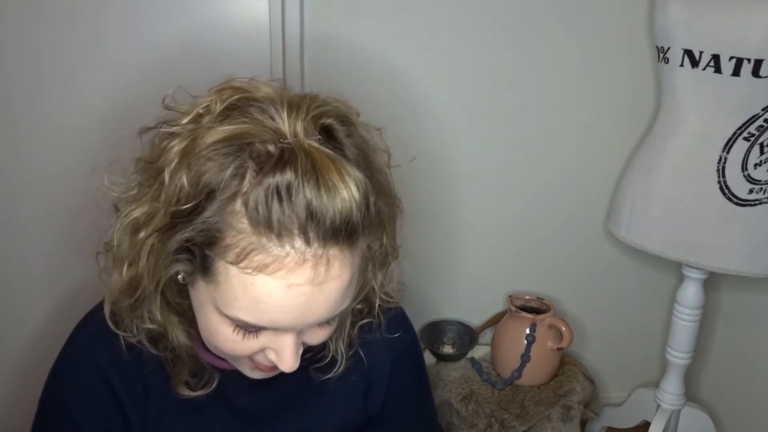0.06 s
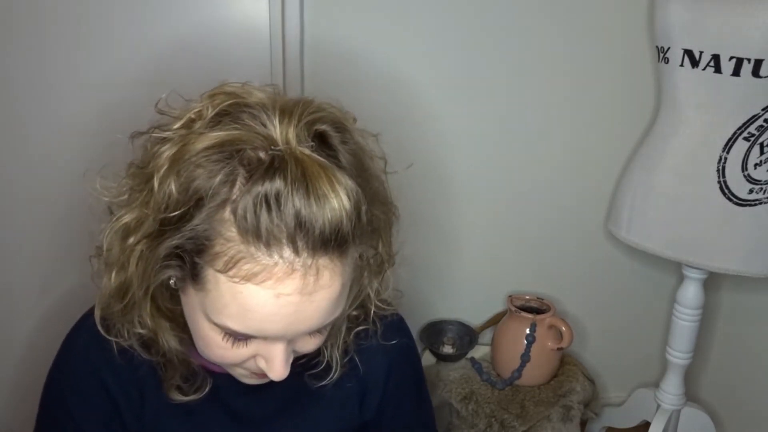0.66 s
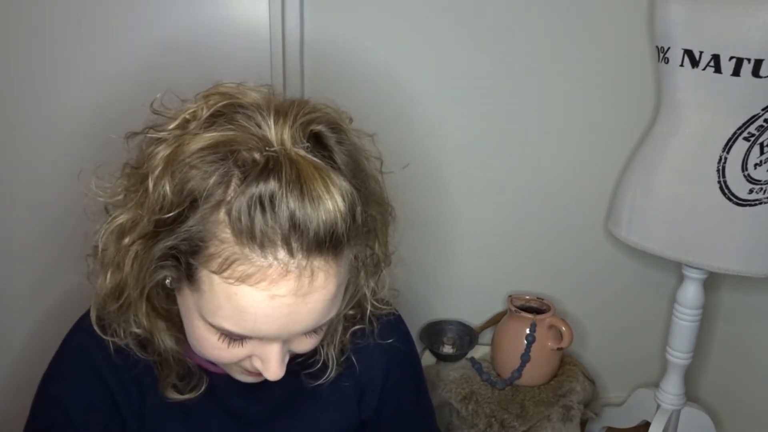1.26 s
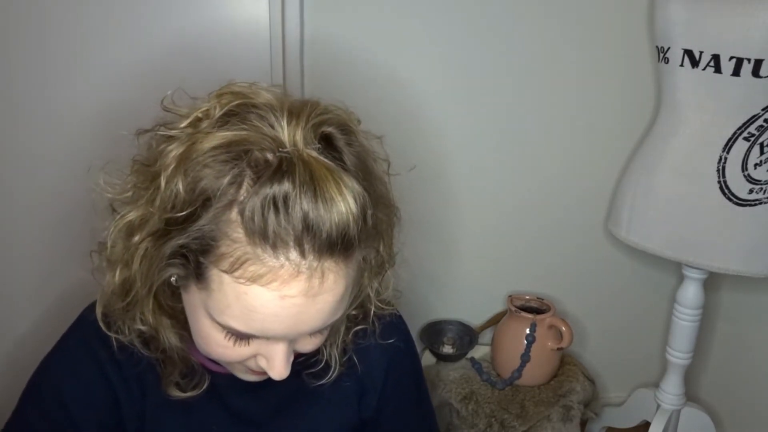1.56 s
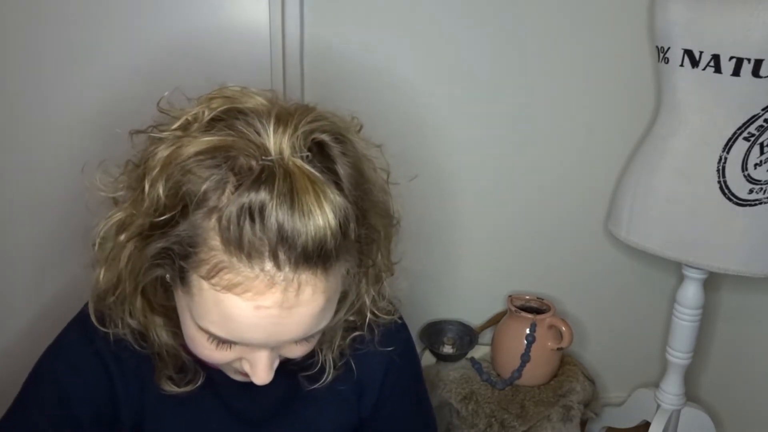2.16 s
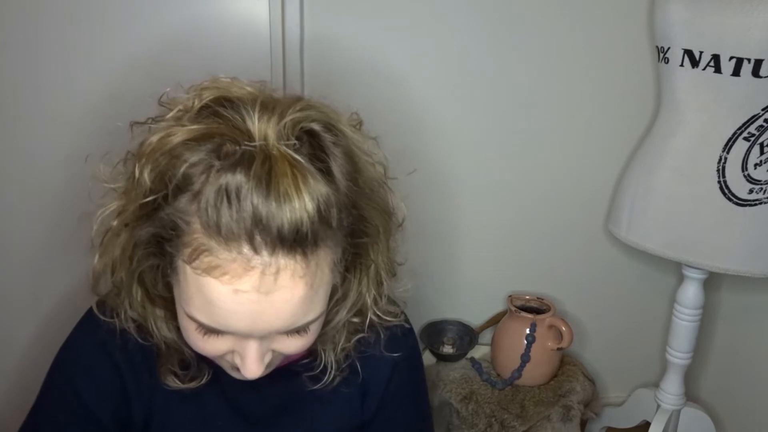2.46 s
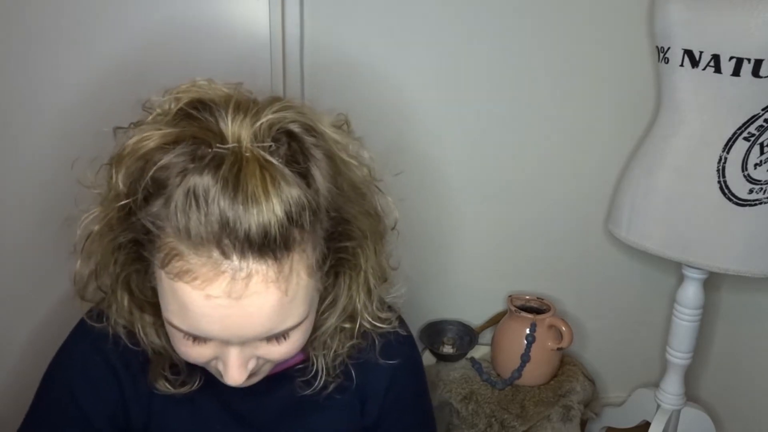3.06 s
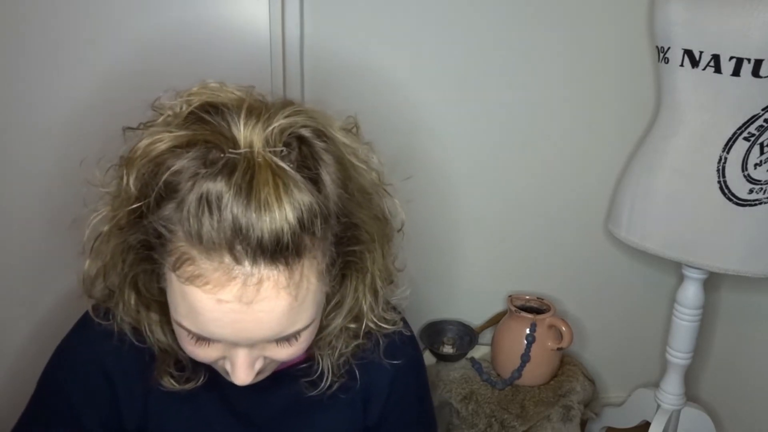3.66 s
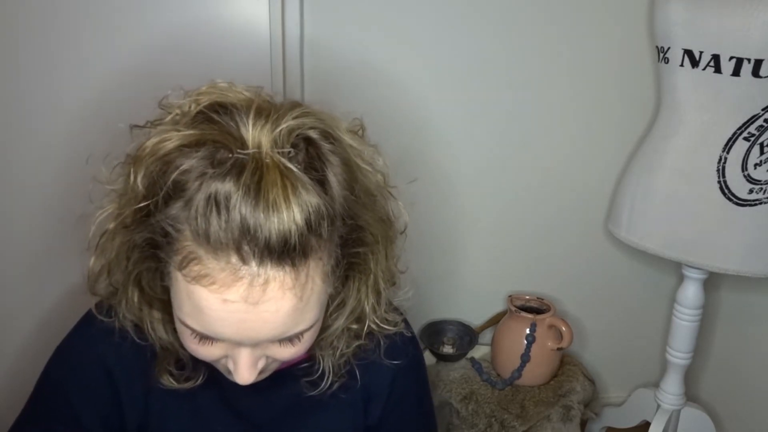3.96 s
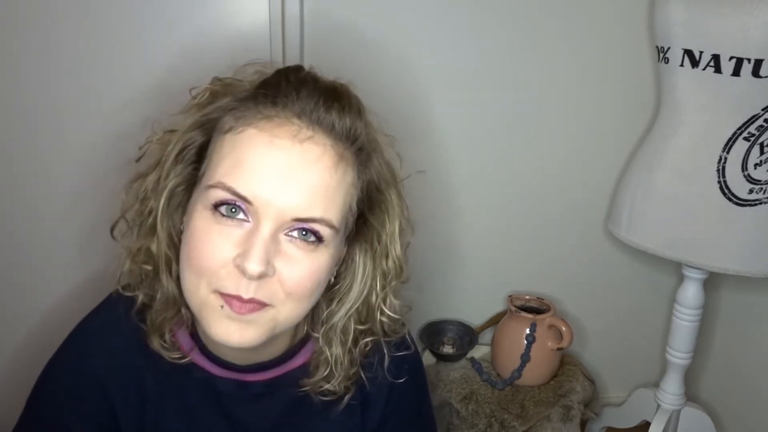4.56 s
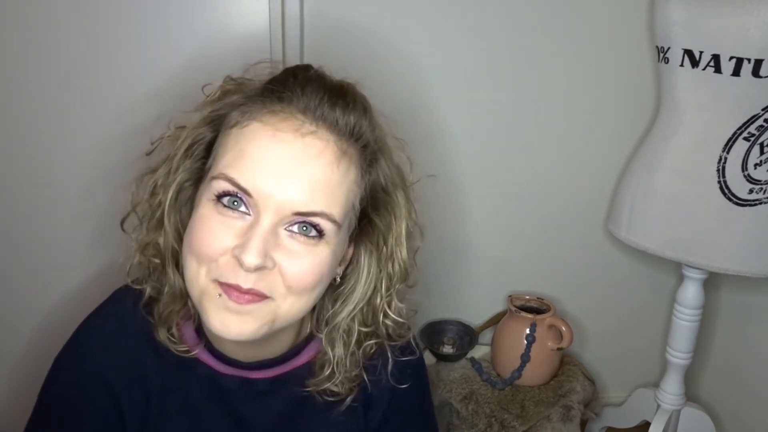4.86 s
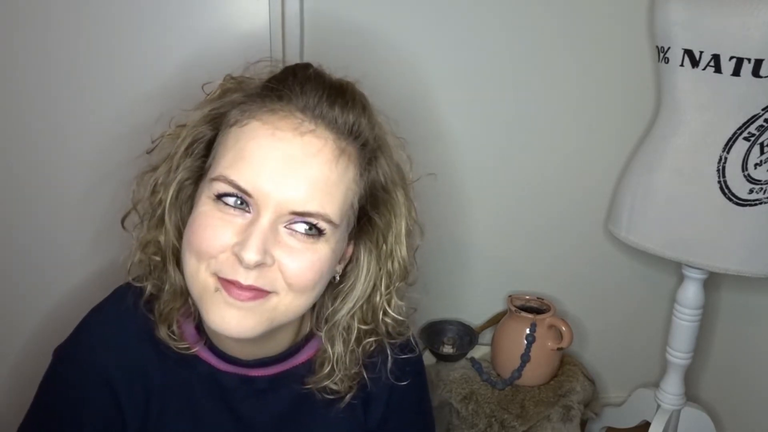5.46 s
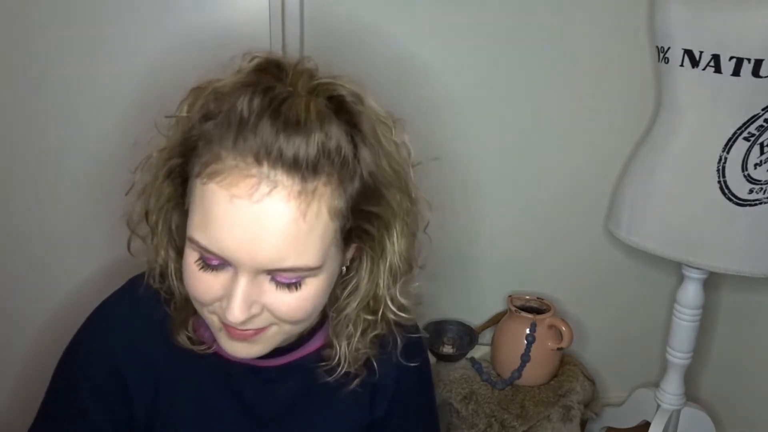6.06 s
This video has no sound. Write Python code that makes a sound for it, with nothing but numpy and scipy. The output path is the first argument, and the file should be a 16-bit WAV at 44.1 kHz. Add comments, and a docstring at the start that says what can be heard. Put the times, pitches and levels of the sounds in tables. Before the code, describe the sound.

Stiff wrapping paper crinkles as hands unwrap a small parcel close to a stereo microphone. A short rustle opens, followed by a near pause from about 0.3 to 0.5 seconds. Light, uneven crinkles resume, growing sharper between 1.6 and 1.9 seconds, with a few quick, high hisses of sliding paper. After a brief dip around 2 seconds, dense crackling and crisp crease snaps run from 2.4 to about 4.2 seconds. Soft, hollow bumps and a boxy rustle from the parcel cluster between 2.4 and 3.3 seconds. A sharp snap with a soft knock stands out at 4.5 seconds. The strongest crinkling bursts come from 5 to 5.9 seconds, with one last crackle near 6.2 seconds. The room is small, with a very short reverberation, and a faint hum and low room noise fill the gaps.

```python
"""Stiff wrapping paper crackles as hands unwrap a parcel in a small room, close to a stereo microphone.
Creases buckle in single snaps, small facets in swarms of crinkles; each radiates a brief damped vibration.
Friction between sheets adds hiss, and the hollow wrapping resonates with a low, boxy rustle and soft bumps.
Near walls return a short reverberation, and a faint hum fills the pauses."""
import sys
import numpy as np
from scipy import signal
from scipy.fft import rfft, irfft, next_fast_len
from scipy.io import wavfile
from scipy.ndimage import uniform_filter1d, map_coordinates

SR = 44100
rng = np.random.default_rng(int(sys.argv[2]) if len(sys.argv) > 2 else 0)


def put_to_file(sound):
    """Save the sound as 16-bit audio at rate SR, in the file named by the first command-line argument."""
    columns = np.atleast_2d(sound).T  # one column per channel
    safe = np.clip(columns, -1, 1)
    whole_steps = np.round(safe * 32767)
    wavfile.write(sys.argv[1], SR, whole_steps.astype(np.int16))


N = 278271


def amp(db):
    """Amplitude ratio of a level in decibels."""
    return 10 ** (np.asarray(db) / 20)


def unit(x):
    """Normalisation to an rms of 1."""
    return x / np.sqrt(np.mean(x ** 2) + 1e-20)


def along(points, hz):
    """Interpolation of (f/Hz, value) points on a logarithmic frequency axis."""
    f, value = np.transpose(points)
    return np.interp(np.log(hz + 1), np.log(f + 1), value)


def wobble(rate):
    """Random fluctuation: straight lines between Gaussian values, rate of them a second."""
    knots = rng.standard_normal(int(N * rate / SR) + 4)
    return map_coordinates(knots, [np.arange(N) * rate / SR], order=1)


def filtered(x, response):
    """Linear filtering: the spectrum of x times a frequency response."""
    size = next_fast_len(N + SR // 4)
    return irfft(rfft(x, size) * response(np.fft.rfftfreq(size, 1 / SR)), size)[..., :N]


def causal(gain):
    """Causality: the minimum-phase response with this gain rings only after its excitation."""
    cepstrum = irfft(np.log(np.maximum(gain, 1e-6)))
    half = cepstrum.shape[-1] // 2
    return np.exp(rfft(cepstrum * np.r_[1, np.full(half - 1, 2), 1, np.zeros(half - 1)]))


def coloured(x, points, size=4096):
    """Convolution with a causal filter whose gain follows (f/Hz, level/dB) points."""
    kernel = irfft(causal(amp(along(points, np.fft.rfftfreq(size, 1 / SR)))))
    return signal.oaconvolve(x, kernel[None], axes=1)[:, :N]


def stroke(start, hold, attack_s, release_db_per_s):
    """Envelope of a finger movement (linear rise, hold, exponential decay): its span and gain."""
    first = max(round(start * SR), 0)
    age = np.arange(min(SR // 2, N - first)) / SR
    gain = np.minimum(age / attack_s, 1) * amp(-release_db_per_s * np.maximum(age - hold, 0))
    return slice(first, first + len(age)), gain


def handling(uneven_db=2.11):
    """Incoherent sources add in power: squeezes of the paper on top of its gentle shifting."""
    # squeezes and pulls: t/s, hold/s, crinkle level/dB, then fizz/dB and hollow body/dB relative
    # to the crinkle, and large over small facets/dB
    squeezes = [(0, 0.106, -33, -7.0, -11.5, 8), (0.149, 0.035, -30.5, -9.0, -13.5, -1),
                (0.405, 0.051, -49, -25, -3, 7), (0.562, 0.039, -33.5, -14.5, -8, 1),
                (0.769, 0.068, -31.5, -10, -11.5, -1), (0.886, 0.068, -31, -18, -12.5, 4),
                (0.973, 0.066, -30.0, -6.5, -15.0, -2.0), (1.069, 0.018, -30.5, -5, -2.5, 8),
                (1.298, 0.058, -35.5, -4.5, -23, 5), (1.576, 0.054, -32.5, -10.5, -9.5, 4),
                (1.662, 0.037, -22, -12, -13.0, 3), (1.791, 0.097, -26.5, -14.5, -11, 1),
                (1.901, 0.04, -20, -9.5, -19, 4), (2.218, 0.11, -29.5, -14, -11.5, -2),
                (2.425, 0.22, -28.5, -8, -9.5, 1), (2.79, 0.16, -32.5, -9.0, -5, 8.5),
                (2.97, 0.17, -28.5, -12.5, -7, 2), (3.32, 0.08, -27.0, -15, -10.5, -1.5),
                (3.485, 0.08, -35, -20, -6, 1), (3.568, 0.15, -32, -5, -9, -9),
                (3.786, 0.071, -22, -13.5, -13.5, 1), (3.969, 0.035, -33.5, -10.5, -2, 4),
                (4.057, 0.067, -26.5, -15, -11.0, 0.5), (4.217, 0.097, -22.5, -17, -15, 1.5),
                (4.407, 0.12, -30.0, -21, -14.0, 0), (4.48, 0.029, -21, -18, -12, 0),
                (4.559, 0.037, -26.5, -7, -9.0, -6), (4.652, 0.17, -34.5, -7.5, -14.0, -3),
                (4.899, 0.035, -27, -4, -22, 1), (4.995, 0.059, -20, -10, -18.5, -4.5),
                (5.172, 0.049, -20, -7, -14.5, 2.5), (5.248, 0.056, -17.5, -13.5, -14, -1.5),
                (5.405, 0.115, -25, -9.5, -16, -1.5), (5.723, 0.18, -21.5, -7, -15, -4),
                (6.155, 0.046, -25.5, -8, -16, -2)]
    # the parcel shifting in the hands: t/s, crinkle level/dB
    shifting = [(0.0, -28), (0.24, -68), (0.3, -58.5), (0.53, -61.5), (0.68, -42), (1.15, -39), (1.5, -35),
                (2.0, -43), (2.12, -42.5), (2.4, -30), (2.75, -31.5), (3.15, -37), (3.28, -40),
                (3.6, -31.5), (3.94, -45), (4.15, -35.5), (4.39, -41.5), (4.85, -32.5), (5.36, -28),
                (5.62, -36.5), (6.0, -33.5), (6.12, -42), (6.31, -52)]
    shares = lambda fizz_db, hollow_db, large_db: amp([0, fizz_db, hollow_db, large_db])[:, None] ** 2
    shift = amp(np.interp(np.arange(N) / SR, *np.transpose(shifting)))
    power = shares(fizz_db=-11, hollow_db=-11.5, large_db=0) * shift ** 2
    for start, hold, db, *colour in squeezes:
        span, press = stroke(start, hold, attack_s=.012, release_db_per_s=343)
        power[:, span] += shares(*colour) * (amp(db) * press) ** 2
    level_db, *colour_db = 10 * np.log10(power)
    unsteady_db = uneven_db * wobble(30)  # finger pressure is never quite steady
    return level_db + unsteady_db, *(colour_db - level_db)


def buckles(per_s, spread_db, cycles, low_hz, high_hz, clump_db, slide, size=200):
    """Buckling facets ring as damped oscillators, in clumps, over the friction hiss of sliding sheets."""
    draw = rng.random((int(per_s * N / SR), 5))
    start = (draw[:, :1] * N).astype(int)
    hz = low_hz * (high_hz / low_hz) ** draw[:, 1:2]
    strength = amp(-spread_db * np.log(draw[:, 2:3] * .97 + .03))
    phase = hz * np.arange(size) / SR
    envelope = strength * hz * np.exp(-phase / cycles) * (1 - np.exp(-2 * np.pi * phase))
    rings = [envelope * np.sin(2 * np.pi * (phase + draw[:, k, None])) for k in (3, 4)]
    where = (start + np.arange(size)).ravel()
    pair = np.array([np.bincount(where, ring.ravel(), N)[:N] for ring in rings])
    pair = (unit(pair) + slide * rng.standard_normal((2, N))) * amp(clump_db * wobble(130))
    # the hands feed in energy steadily, however unevenly the paper lets it go
    power = uniform_filter1d(np.mean(pair ** 2, 0), SR // 25)
    return pair / np.sqrt(np.abs(power) + 1e-9)


def parcel(x):
    """Resonance: modes of the folded wrapping and the box inside favour a few frequencies."""
    # modes: f/Hz, bandwidth/Hz, level/dB relative to the broad rustle
    modes = [(341.5, 34, 2.5), (783, 7.3, 4.5), (1362, 16, -1), (1602, 14, -11), (1644, 68, -8.5),
             (2640, 69, -11)]
    return filtered(x, lambda f: 1 + sum(amp(db) * 1j * f * width / (f0 * f0 - f * f + 1j * f * width)
                                         for f0, width, db in modes))


def rustle(level_db, fizz_db, hollow_db, large_db):
    """Frequency rises as size falls: whole panels sound hollow, facets crinkle, the smallest fizz."""
    # spectral shapes of the three sizes: f/Hz, relative level/dB
    crinkle_shape = [(200, -49), (500, -2), (800, -5.5), (1050, -3.5), (1600, 1), (2050, -2), (2900, 3.5),
                     (3900, -3.5), (5100, -10.5), (6200, -9.5), (9000, -44), (16000, -42)]
    fizz_shape = [(2000, -23.5), (4500, -1), (6300, 1), (8000, -3.5), (10000, -8.5), (12800, -13),
                  (16000, -17.5)]
    hollow_shape = [(30, -32), (70, -34), (100, -23), (140, -14.5), (180, -9), (270, -3), (350, -0.5),
                    (450, 1), (600, -3), (850, -1), (1400, -28), (4000, -61.5)]
    crinkle = buckles(per_s=1700, spread_db=4, cycles=3.2, low_hz=617, high_hz=9400,
                      clump_db=2.5, slide=1)
    crinkle = unit(parcel(coloured(crinkle, crinkle_shape)))
    broad_folds = filtered(crinkle, lambda hz: 1 / (1 + (hz / 2000) ** 4))
    tight_folds = crinkle - broad_folds
    tilt_db = (large_db + 1) / 2
    crinkle = amp(tilt_db) * broad_folds + amp(-tilt_db) * tight_folds
    fizz = buckles(per_s=3000, spread_db=2.5, cycles=2, low_hz=3800, high_hz=17600,
                   clump_db=1.5, slide=0.88, size=60)
    hollow = buckles(per_s=600, spread_db=2, cycles=1.13, low_hz=123.6, high_hz=1237,
                     clump_db=1, slide=0.63, size=700)
    return (amp(level_db - 0.64) * crinkle
            + amp(level_db + fizz_db + 3.67) * unit(coloured(fizz, fizz_shape))
            + amp(level_db + hollow_db + 1.14) * unit(parcel(coloured(hollow, hollow_shape))))


def background(air_db=-58, hum_db=-57.5, hum_hz=382):
    """Noise floor: broadband room noise and a hum, slightly modulated in amplitude and frequency."""
    # spectrum of the room noise: f/Hz, relative level/dB
    air_shape = [(25, -12), (100, 2.5), (270, -1), (380, -2), (700, -6), (1020, 5.5), (1300, -39),
                 (4900, -13.5), (13600, -19), (16000, -34)]
    air = unit(stereo(coloured(rng.standard_normal((2, N)), air_shape)))
    hum_gain = amp(hum_db + wobble(12))
    hum_phase = 2 * np.pi * np.cumsum(hum_hz + 2.5 * wobble(15)) / SR
    return amp(air_db) * air + hum_gain * unit(np.sin(hum_phase))


def creases(level_db, per_s=15, spread_db=3.5, centre_hz=2520, spread_octaves=0.5):
    """Elastic instability: rows of stiff creases that yield at set times and lesser ones at random."""
    # stiff creases: t/s, relative level/dB, centre f/Hz, bandwidth/octaves
    stiff = [(0.1498, -23, 3400, 0.5), (0.162, -20, 3140, 0.99), (0.1993, -17, 3360, 0.26),
             (0.419, -42.5, 2570.0, 0.51), (0.448, -39.5, 2340.0, 0.84), (0.5422, -42.5, 3570.0, 0.57),
             (0.6012, -25.5, 2830, 0.67), (0.657, -25, 2430, 0.9), (0.7862, -23.5, 3740, 0.61),
             (0.896, -24, 2720.0, 0.94), (0.9574, -28, 2470.0, 0.68), (0.988, -17.5, 3050, 0.63),
             (1.0815, -16.5, 2070.0, 0.73), (1.2368, -23.5, 3350, 0.98), (1.317, -17, 4730, 0.26),
             (1.3465, -20, 3170.0, 0.86), (1.378, -18.5, 5500, 0.38), (1.4603, -21, 3800, 0.69),
             (1.5745, -28, 2440.0, 1), (1.5841, -17, 3350, 0.98), (1.6705, -22.5, 2790.0, 0.81),
             (1.7098, -11.5, 3000, 0.57), (1.8175, -17.5, 1760.0, 0.83), (1.9173, -12, 3530, 0.46),
             (2.0745, -30, 2620, 0.41), (2.2097, -27, 2680.0, 0.3), (2.3555, -10.5, 3450, 0.89),
             (2.4532, -9.5, 3630, 0.49), (2.5479, -16.5, 2420.0, 0.94), (2.6225, -13.5, 2250, 0.7),
             (2.6817, -17.5, 3140, 0.37), (2.7612, -21.5, 4000, 1), (2.8035, -19.5, 1280, 0.88),
             (2.8352, -15, 2780, 0.25), (2.8609, -17.5, 3000.0, 1), (2.9032, -16.5, 2340, 1),
             (2.9236, -17, 3190.0, 0.68), (2.947, -16.5, 2570, 0.61), (3.0121, -15, 2810.0, 0.62),
             (3.0174, -11.5, 2740, 0.64), (3.069, -14, 1900, 0.42), (3.074, -13.5, 2710, 0.62),
             (3.1041, -15, 2770, 0.3), (3.1655, -19, 1720, 1), (3.2391, -28, 2280.0, 0.41),
             (3.276, -30.5, 4100, 0.83), (3.3984, -12, 3040.0, 0.46), (3.4775, -21, 1700, 0.27),
             (3.5013, -14.5, 3250, 0.66), (3.5764, -13, 4900, 0.4), (3.62, -12, 2700, 0.94),
             (3.6364, -15, 3230, 0.92), (3.667, -9.5, 2760.0, 0.69), (3.6882, -19.5, 2990.0, 0.44),
             (3.7066, -17, 1960.0, 0.58), (3.7962, -13.5, 3070, 0.35), (3.8058, -11.5, 3060, 0.68),
             (3.848, -17, 2390.0, 1), (3.8684, -13, 2820, 0.76), (3.9863, -18.5, 2370, 0.52),
             (4.0531, -16, 2350, 0.99), (4.1017, -15.5, 2480, 0.33), (4.167, -21.5, 2630, 0.36),
             (4.2148, -18.5, 3490.0, 0.55), (4.2369, -16, 1620, 0.16), (4.4968, -17.5, 3340.0, 0.88),
             (4.5037, -8, 3000, 0.74), (4.5897, -11.5, 3450, 0.61), (4.6619, -13, 4630.0, 0.79),
             (4.779, -21.5, 6300, 0.52), (4.8606, -18.5, 2240, 0.93), (4.9205, -20.5, 3030, 0.93),
             (4.9977, -19.5, 1860.0, 0.53), (5.028, -12.5, 3300.0, 1), (5.1912, -11, 2610.0, 1),
             (5.266, -12.5, 2620, 0.86), (5.271, -11.5, 2450, 0.61), (5.4183, -15.5, 3010.0, 0.75),
             (5.5945, -21.5, 3200, 0.46), (5.6532, -20, 2960.0, 1), (5.6871, -18.5, 3020.0, 0.61),
             (5.809, -12, 3080, 0.96), (5.9717, -11, 3500, 0.6), (6.0395, -19.5, 3560.0, 0.65),
             (6.0882, -20.5, 2300, 0.83), (6.1364, -24, 3500.0, 0.45), (6.1957, -12.5, 3900, 0.73)]
    draw = rng.random((int(per_s * N / SR), 3))
    at = (draw[:, 0] * N).astype(int)
    size, pitch = np.sqrt(3) * (2 * draw[:, 1:].T - 1)  # uniform, with unit variance
    # lesser creases follow the crinkle level, up to a ceiling
    db = np.minimum(level_db[at] + 6.5, -23.5) + spread_db * size
    hz = centre_hz * 2 ** (spread_octaves * pitch)
    return list(stiff) + [(*row, 0.62) for row in zip(at / SR, db, hz)]


def snaps(rows, decay_s=0.0015, shiver_db=-18, shiver_s=0.0035, travel=0.001271, size=2048):
    """Snap-through: a crease releases its elastic energy in a burst; the sheet shivers a little longer."""
    out = np.zeros((2, N + size))
    t, hz = np.arange(size) / SR, np.fft.rfftfreq(size, 1 / SR)
    envelope = np.exp(-t / decay_s) + amp(shiver_db) * np.exp(-t / shiver_s)
    # higher bending waves cross the sheet faster, which softens the click
    dispersion = np.exp(-4j * np.pi * travel * np.sqrt(600 * hz))
    for start, db, centre_hz, octaves in rows:
        detuning = np.log2((hz + 1) / centre_hz) / max(octaves, .2)
        gain = (1 + detuning ** 2 / 7) ** -2
        gain *= np.sqrt(centre_hz / (hz + 900)) / np.sqrt(1 + (hz / (3 * centre_hz)) ** 4)
        gain *= hz ** 2 / (hz ** 2 + 180 ** 2)  # a thin sheet radiates no deep bass
        burst = rng.choice([-1, 1], (2, size)) * envelope
        snap = irfft(rfft(burst) * causal(gain) * dispersion)
        snap /= np.sqrt(np.mean(snap[:, :SR // 333] ** 2, axis=1, keepdims=True))  # rms of first 3 ms
        out[:, max(round(start * SR), 0):][:, :size] += amp(db) * snap
    return out[:, :N]


def bumps(decay_cycles=3.3, size=4096):
    """Damped free vibration: a soft push makes a panel of the parcel swing for a few cycles."""
    # finger bumps and popping panels: t/s, relative level/dB, f/Hz
    pushes = [(1.083, -41, 335), (1.085, -46, 170), (1.674, -22, 370), (1.817, -20, 370), (1.85, -17, 730),
              (2.404, -19.5, 845), (2.564, -23, 348), (2.629, -10, 815), (2.804, -13.5, 795),
              (2.855, -19, 358), (2.932, -17.5, 350), (2.999, -15.5, 364), (3.017, -11, 344),
              (3.02, -15, 750), (3.239, -27, 670), (3.322, -20.5, 330), (3.805, -18.5, 474),
              (4.096, -33.5, 178), (4.5, -15, 767), (4.586, -27, 322), (4.949, -30, 240), (5.188, -23, 750),
              (5.318, -23, 393)]
    out, t = np.zeros(N + size), np.arange(size) / SR
    for start, db, hz in pushes:
        phase = hz * t
        envelope = np.exp(-phase / decay_cycles) * (1 - np.exp(-phase))
        out[round(start * SR):][:size] += amp(db) * envelope * np.sin(2 * np.pi * phase)
    return out[:N] * np.array([[1], [0]])  # mid signal only


def slips(grain_db=2):
    """Sliding friction: one sheet slips quickly over another with a grainy, very high hiss."""
    # slips: t/s, hold/s, level/dB
    slides = [(1.375, 0.028, -33), (1.46, 0.02, -41), (1.863, 0.018, -32), (1.911, 0.031, -29),
              (3.375, 0.01, -26), (3.578, 0.02, -47), (4.503, 0.022, -29.5), (4.665, 0.015, -39)]
    # spectrum of the hiss: f/Hz, relative level/dB
    hiss_shape = [(4000, -17), (7000, -1), (10000, -2), (12800, -3), (16000, -11)]
    gain = np.zeros(N)
    for start, hold, db in slides:
        span, slide = stroke(start, hold, attack_s=0.0027, release_db_per_s=450)
        gain[span] += amp(db) * slide
    friction = rng.standard_normal((2, N)) * amp(grain_db * wobble(400))
    return gain * unit(coloured(friction, hiss_shape))


def room(x, onset_s=0.0011, patterns=22):
    """Reverberation: reflections from near walls decay exponentially, changing as the paper moves."""
    # reverberation time: f/Hz, T60/s
    t60 = [(200, 0.15), (600, 0.17), (1500, 0.19), (3700, 0.18), (10000, 0.19)]
    hz, t, noise = signal.stft(rng.standard_normal((patterns, 2, SR // 4)), SR, nperseg=256)
    tails = signal.istft(noise * amp(-60 * t / along(t60, hz)[:, None]), SR, nperseg=256)[1]
    age = np.arange(tails.shape[-1]) / SR
    tails *= 1 - np.exp(-(age / onset_s) ** 2)
    tails /= np.linalg.norm(tails, axis=-1, keepdims=True)
    out, step = np.zeros((2, N + SR)), N // patterns + 1
    for k, tail in enumerate(tails):
        echo = signal.fftconvolve(x[:, k * step:(k + 1) * step], tail, axes=1)
        out[:, k * step:][:, :echo.shape[1]] += echo
    return out[:, :N]


def stereo(pair):
    """Partial coherence: unrelated mid and side give left and right, alike in bass, apart in treble."""
    # likeness of left and right: f/Hz, correlation
    correlation = [(150, .985), (330, .996), (600, .97), (1000, .93), (1600, .95), (2900, .88), (3900, .45),
                   (4600, .4), (5200, -.05), (6200, .55), (7500, 0), (9500, -.18), (12800, .1),
                   (16000, -.3)]
    # lead of left over right: f/Hz, level/dB
    balance = [(300, 0), (1000, .3), (2700, 1.5), (3800, 1), (4800, -1), (5500, 1.4), (7000, -2), (8000, 0)]
    angle = lambda hz: np.arccos(np.clip(along(correlation, hz), -1, 1)) / 2
    mid, side = filtered(pair, lambda hz: np.array([np.cos(angle(hz)), np.sin(angle(hz))]))
    left_right = np.array([mid + side, mid - side])
    return filtered(left_right, lambda hz: amp(along(balance, hz) * np.array([[.5], [-.5]])))


def scene():
    """Superposition of the paper's direct sound, its reverberation and the noise floor."""
    level_db, fizz_db, hollow_db, large_db = handling()
    crinkles = rustle(level_db, fizz_db, hollow_db, large_db) + slips() + amp(2) * bumps()
    cracks = amp(-1.5) * parcel(snaps(creases(level_db)))
    echo = room(amp(-10) * crinkles + amp(-5) * cracks)
    return stereo(crinkles + cracks + echo) + background()


def record(dry):
    """Soft saturation rounds the highest peaks; a band limit removes the extreme treble."""
    rounded = dry / (1 + np.abs(dry / .9) ** 4) ** (1 / 4)
    return filtered(rounded, lambda hz: hz < 15900)


dry = scene()
out = record(dry)
put_to_file(out)
```